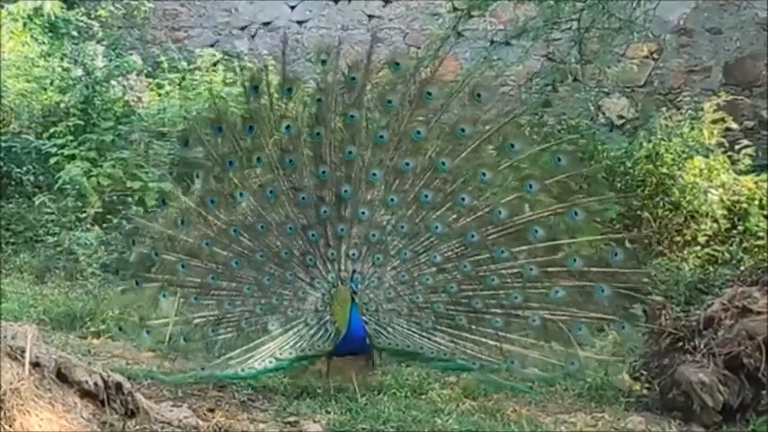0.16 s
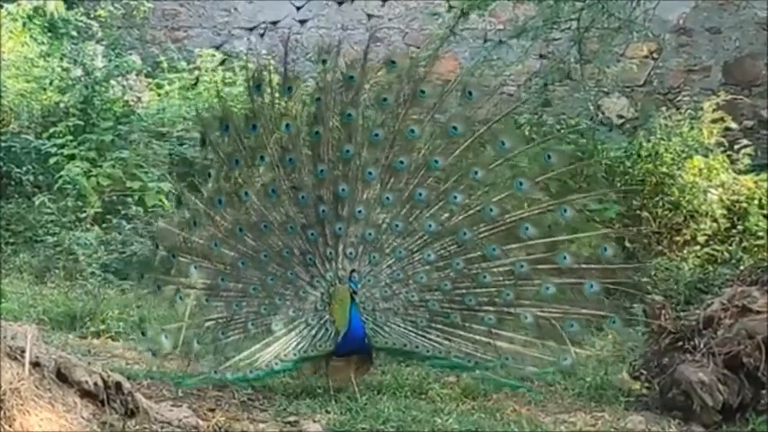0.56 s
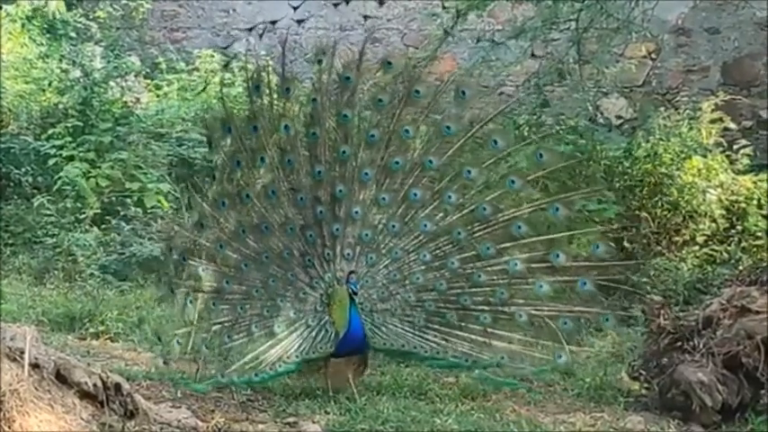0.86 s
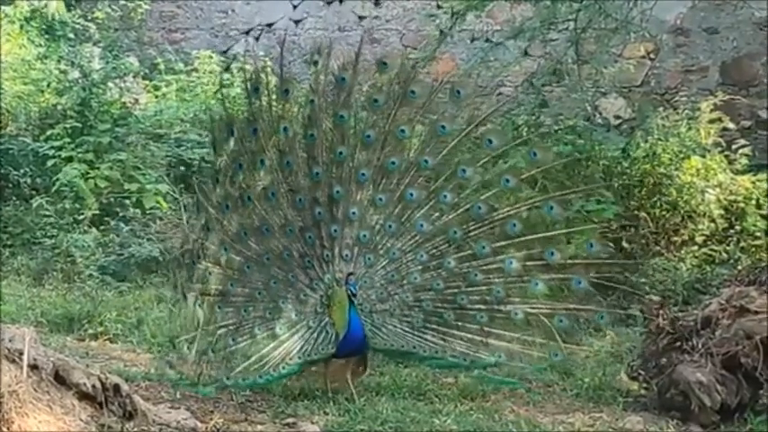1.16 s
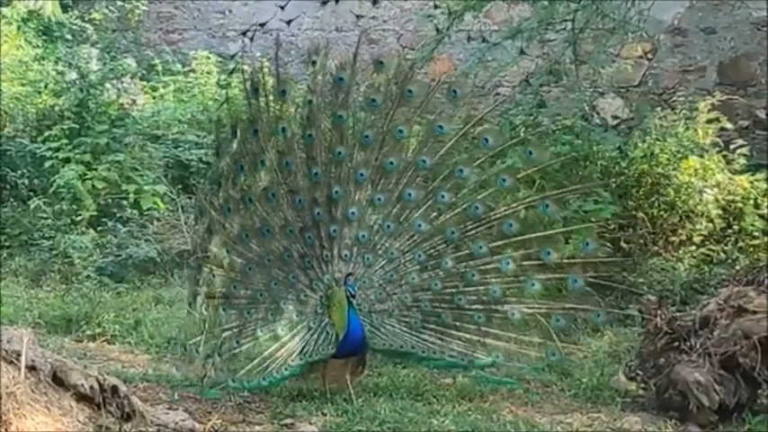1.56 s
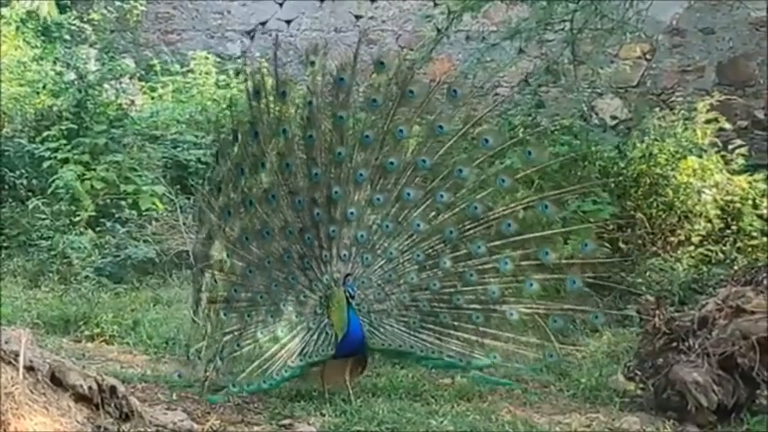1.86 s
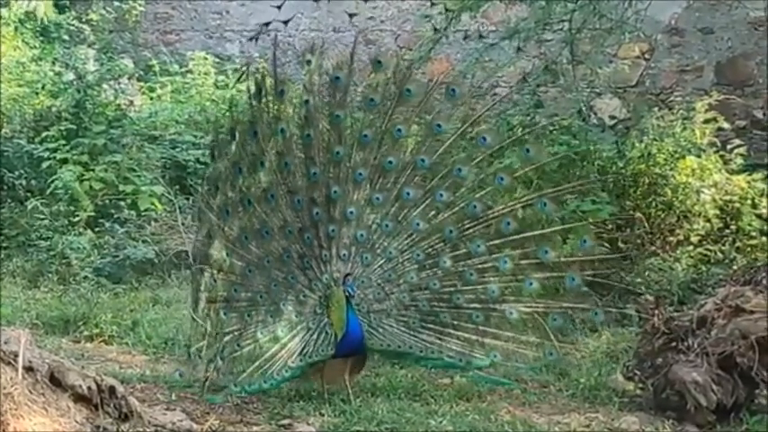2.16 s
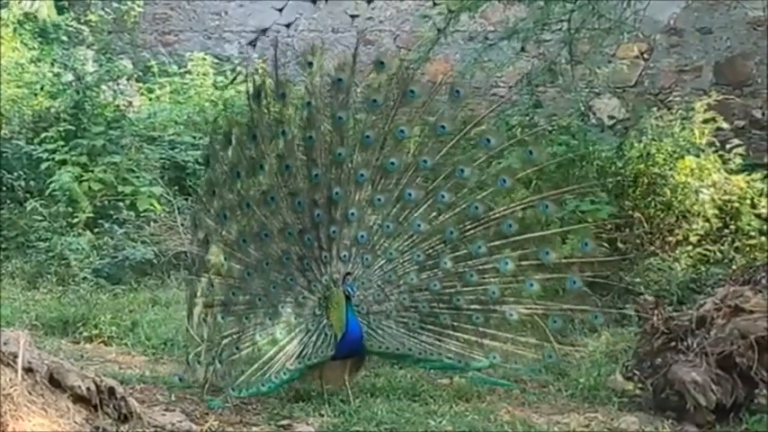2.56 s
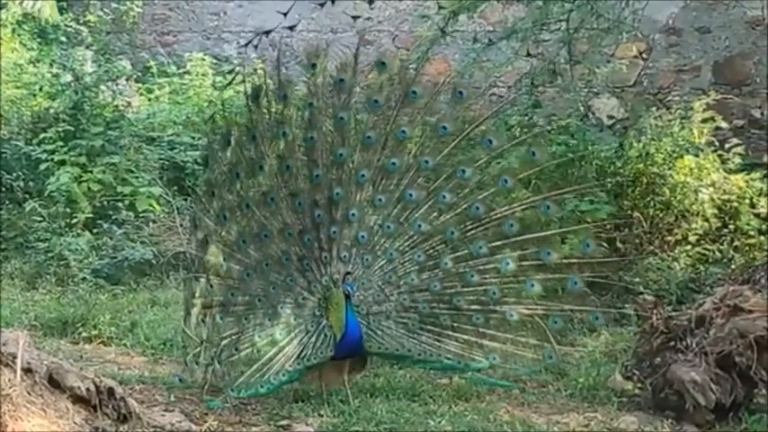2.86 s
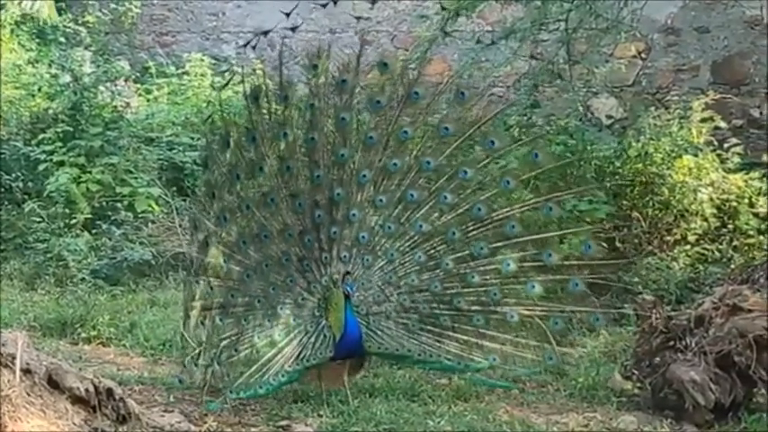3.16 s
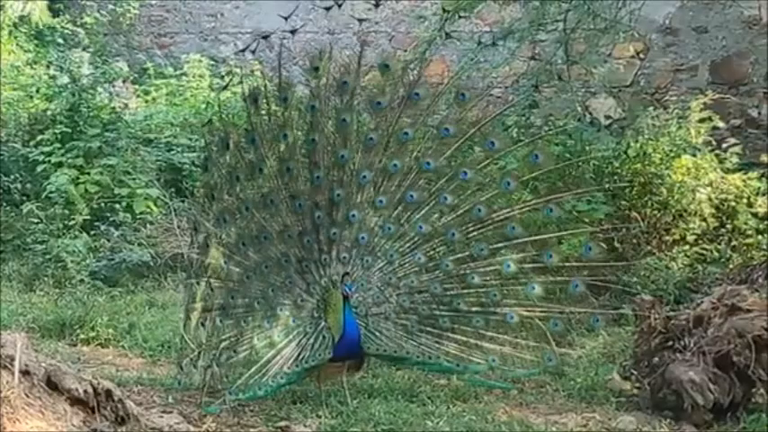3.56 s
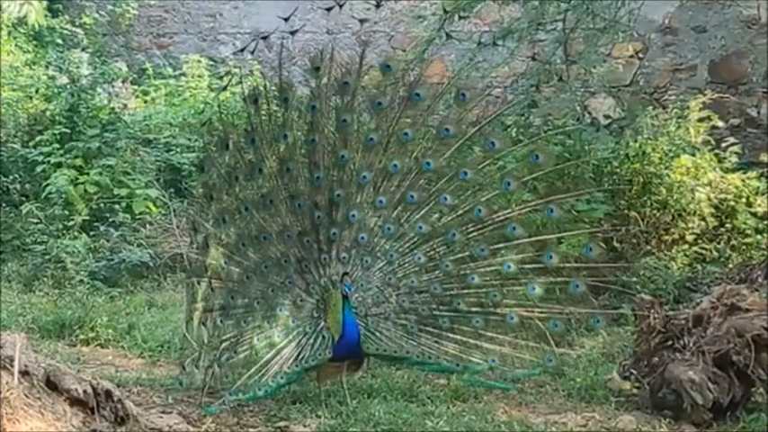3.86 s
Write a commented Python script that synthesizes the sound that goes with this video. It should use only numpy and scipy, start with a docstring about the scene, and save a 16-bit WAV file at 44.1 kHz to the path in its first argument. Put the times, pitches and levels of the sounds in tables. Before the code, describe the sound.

A peacock cries loudly from the start, the tail of one call followed by six nasal, brassy cries that rise and fall, each longer and more widely spaced, ending near 2.3 s with a brief garden echo. From about 2.5 s a faint high trill ticks steadily on the left, with occasional chirps, distant soft coos, low hum, rustling leaves and small dry scrapes near 3.1 and 3.7 s.

```python
"""In a walled garden that echoes briefly, a peacock a few metres from the stereo microphones gives seven
arched, brassy cries: gliding harmonics under a fixed throat colour, raspier when the pitch is low.
Behind it a small bird trills and another chirps in near-sine sweeps, and a dove coos softly far off.
Shaped noise makes the leaves, which rustle and scrape over a low hum."""
import sys
import numpy as np
from scipy import signal
from scipy.fft import rfft, irfft, next_fast_len
from scipy.io import wavfile
from scipy.ndimage import uniform_filter1d

SR = 44100
rng = np.random.default_rng(int(sys.argv[2]) if len(sys.argv) > 2 else 0)


def store_wav(level_fs):
    """Save 16-bit WAV to argv[1]."""
    pcm = np.round(np.clip(np.atleast_2d(level_fs), -1, 1) * 32767)
    wavfile.write(sys.argv[1], SR, pcm.T.astype(np.int16))


N = 176400
T = np.arange(N) / SR


def undb(db):
    """Decibels to amplitude."""
    return 10 ** (np.asarray(db) / 20)


def read(table, hz, axis=1):
    """A column of a table at these frequencies, straight on a log axis."""
    table = np.array(sorted(table), float)
    return np.interp(np.log(hz), np.log(table[:, 0]), table[:, axis])


def walk(rate_hz, size=N):
    """Smooth chance with spread 1: noise averaged twice over one period of the rate."""
    width = max(int(SR / rate_hz), 1)
    w = uniform_filter1d(uniform_filter1d(rng.standard_normal(size), width), width)
    return w / w.std()


def pan(x, db):
    """Left and right copies, the left louder by db."""
    return x * undb(np.array([[db], [-db]]) / 2)


def gate(t, length, attack, release):
    """Rounded rise and fall."""
    nearest_edge = np.minimum(t / attack, (length - t) / release)
    return np.sin(np.pi / 2 * np.clip(nearest_edge, 0, 1)) ** 2


# The peacock's cries, one list each, before throat colour: start_s [s], pitch_hz [Hz], level_db [relative dB]
CRIES = [
    [(0.0, 658, -12), (0.023, 633, -18.5), (0.044, 585, -26.5), (0.058, 495, -25)],
    [(0.166, 601.4, -25.5), (0.214, 649, -16.5), (0.244, 687, -20.5), (0.273, 699, -18),
     (0.3, 700.6, -20.5), (0.328, 664.6, -17), (0.353, 622, -20), (0.367, 575, -26), (0.378, 525, -30.5)],
    [(0.473, 595, -27.5), (0.518, 651, -16), (0.546, 689.7, -19.5), (0.575, 700, -18),
     (0.601, 703.5, -18.5), (0.627, 665, -17.5), (0.651, 644, -18), (0.665, 576, -25.5), (0.675, 504, -25)],
    [(0.772, 592, -32.5), (0.79, 618, -23.5), (0.816, 649, -16.5), (0.844, 673, -22.5), (0.872, 703, -16.5),
     (0.898, 708, -21), (0.924, 668, -17), (0.948, 641, -19.5), (0.962, 563, -23), (0.972, 540, -31)],
    [(1.084, 593, -32.5), (1.105, 631.5, -20.5), (1.136, 659, -19), (1.17, 691, -19.5), (1.203, 707.3, -17),
     (1.234, 711, -17.5), (1.265, 678, -20), (1.293, 644, -18.5), (1.31, 586, -26), (1.322, 528, -20)],
    [(1.446, 591, -30.5), (1.471, 636, -18.5), (1.507, 667, -21), (1.545, 708, -18), (1.584, 712.3, -17),
     (1.62, 713.6, -15), (1.656, 690.7, -20), (1.689, 648, -15.5), (1.708, 595.5, -26.5),
     (1.722, 547, -23.5)],
    [(1.896, 586, -34), (1.932, 635, -21.5), (1.983, 686, -19), (2.039, 714, -17.5), (2.094, 714.4, -15),
     (2.145, 718.8, -15.5), (2.197, 690, -20), (2.244, 647, -17), (2.272, 609, -24), (2.292, 552, -21.5)],
]
# Colour of throat and path at the two microphones: frequency_hz [Hz], left_db [dB], right_db [dB]
THROAT_COLOUR = [(600, -32, -34), (710, -9, -10), (1200, 2, -2), (1330, 4, 2), (1430, -1, -3),
                 (1850, -2, -2), (2050, -4, -9), (2140, -2, 1), (2350, 2, 7), (2500, -11, -5),
                 (2650, -4, 0), (2850, -7, -1), (3050, -8, -10), (3250, 1, -6), (3450, -9, -7),
                 (3800, -12, -9), (4250, -6, 3), (4600, -8, -1), (5000, -19, -4), (5700, -17, -1),
                 (6000, -20, -7), (6420, -25, -18), (6800, -27, -17), (7100, -12, -2), (7400, -20, 0),
                 (7830, -14, 6), (8200, -21, -8), (8600, -6, 2), (9200, -3, -5), (9600, -19, -24),
                 (10700, -14, -28), (11400, -39, -38), (13300, -26, -26)]
# Phase between the microphones: frequency_hz [Hz], left_lead_rad [radians by which left leads]
LEFT_LEAD = [(600, -.2), (2100, -.4), (2900, -1), (3250, 1.6), (3500, -1.2), (5300, -1.4), (6300, 2),
             (7100, -.9), (7900, -.9), (8250, -3.4), (9300, -3.6), (14000, -9)]
ATTACK_S, RELEASE_S = 0.0099, 0.02
JITTER, JITTER_HZ = 0.00068, 60  # spread of pitch as a fraction, and its rate
SHIMMER_DB, SHIMMER_HZ = 1.9, 50  # spread of each harmonic's level, and its rate
# Noisy skirt of each harmonic, stronger as the pitch sinks below CLEAN_HZ
RASP_DB, RASP_HZ, CLEAN_HZ, RASP_DB_PER_HZ = -28, 300, 670.6, 0.75
DULL_DB_PER_OCTAVE_PER_HZ = 0.0898  # treble tilt for each Hz the pitch lies below CLEAN_HZ
# The voice cracks and dulls as it passes this pitch
BREAK_HZ, BREAK_WIDTH_HZ, BREAK_DB_PER_OCTAVE = 682.4, 9, 5.5


def peacock():
    """Harmonics of the arching pitch slide under a fixed colour; low pitch is raspier."""
    out = np.zeros((2, N))
    jitter = 1 + JITTER * walk(JITTER_HZ)
    wobble = [(walk(SHIMMER_HZ), walk(RASP_HZ), walk(RASP_HZ)) for _ in range(3)]
    for cry in CRIES:
        s, hz, db = np.array(cry).T
        on = (T >= s[0]) & (T < s[-1])
        t = T[on]
        smooth = lambda col: uniform_filter1d(np.interp(t, s, col), SR // 55, mode="nearest")
        pitch = smooth(hz) * jitter[on]
        phase = 2 * np.pi * np.cumsum(pitch) / SR
        slack = np.clip(CLEAN_HZ - pitch, -20, 200)
        crack = np.exp(-((pitch - BREAK_HZ) / BREAK_WIDTH_HZ) ** 2)
        rasp = np.minimum(undb(RASP_DB + RASP_DB_PER_HZ * slack) + crack, 1)
        dull = DULL_DB_PER_OCTAVE_PER_HZ * slack + BREAK_DB_PER_OCTAVE * crack
        attack = ATTACK_S if s[0] else .003  # the cry at time zero opens faster
        loud = undb(smooth(db)) * gate(t - s[0], s[-1] - s[0], attack, RELEASE_S)
        for k in range(1, 25):
            f = k * pitch
            # shifted copies of the three wobble sets keep the harmonics unlike
            shimmer, rasp_re, rasp_im = (np.roll(w, 997 * k)[on] for w in wobble[k % 3])
            steadiness = .3 if k == 2 else 1  # the second harmonic shimmers least
            level_db = SHIMMER_DB * shimmer * steadiness - dull * np.log2(f / 2500) - 8
            rasp_share = np.clip((k - 1.7) / 2.7, .1, 1)  # low harmonics stay cleaner
            skirt = 1 + rasp * rasp_share * (rasp_re + 1j * rasp_im)
            wave = loud * undb(level_db) * skirt
            wave = wave * np.exp(1j * (k * phase + np.pi * k * k / 12))
            left = wave * undb(read(THROAT_COLOUR, f)) * np.exp(1j * read(LEFT_LEAD, f))
            out[0, on] += left.real
            out[1, on] += wave.real * undb(read(THROAT_COLOUR, f, axis=2))
    return out


def whistle(start, length, hz, db, edge):
    """One near-sine note; hz is a function of time from its start."""
    t = np.clip(T - start, 0, length)
    return undb(db) * gate(t, length, edge, edge) * np.sin(2 * np.pi * np.cumsum(hz(t)) / SR)


# Notes of the small bird's trill: start_s [s], level_db [relative dB]
TRILL_NOTES = [(2.454, -57.5), (2.5324, -55.5), (2.617, -58), (2.7, -56), (2.7844, -55), (2.868, -55),
               (2.9535, -53.5), (3.0485, -54), (3.1318, -52), (3.2237, -56), (3.3041, -54), (3.3906, -54),
               (3.472, -54), (3.5603, -52.5), (3.647, -55), (3.728, -55.5), (3.815, -52.5), (3.899, -55)]
TRILL_HZ, TRILL_SAG_HZ_PER_S, TRILL_S, TRILL_PAN_DB = 4212, 140, 0.056, -13.5
# Depth of the opening scoop and closing fall as fractions of the pitch; time constant of the scoop
TRILL_SCOOP, TRILL_ARCH, TRILL_SCOOP_S = 0.25, 0.056, 0.00716


def trill():
    """Each note scoops up from below and arches over; the run sags a little."""
    out = 0
    for start, db in TRILL_NOTES:
        top_hz = TRILL_HZ - TRILL_SAG_HZ_PER_S * (start - TRILL_NOTES[0][0])
        scoop = lambda t: TRILL_SCOOP * np.exp(-t / TRILL_SCOOP_S)
        hz = lambda t: top_hz * (1 - scoop(t) - TRILL_ARCH * (t / TRILL_S) ** 3)
        out = out + whistle(start, TRILL_S, hz, db - 2.5, 0.012)
    return pan(out * undb(1.9 * walk(190)), TRILL_PAN_DB)


# The other bird's chirps: start_s [s], length_s [s], from_hz [Hz], to_hz [Hz], level_db [relative dB],
# warble_hz [Hz, spread of the pitch], second_voice [ratio to the first voice's pitch]
CHIRP_NOTES = [(0.658, 0.093, 4730, 5910, -49.5, 80.5, .9), (1.781, 0.05, 6050, 4600, -44, 323, 0.92),
               (2.855, 0.12, 4700, 5900, -55, 120, .89), (3.701, 0.088, 6300, 4640, -55, 250, 0.87),
               (3.955, 0.044, 4320, 6600, -57, 151, 0.85), (3.977, 0.029, 6000, 3760, -51.5, 151, 0.94)]
WARBLE_RATE_HZ, CHIRP_PAN_DB = 450, -5


def chirps():
    """Two-voiced sweeps whose pitches warble fast and separately, with a fluttering level."""
    out = 0
    flutter = undb(3 * walk(200))
    for start, length, a, b, db, warble_hz, ratio in CHIRP_NOTES:
        for r in (1, ratio):
            shake = warble_hz * walk(WARBLE_RATE_HZ)
            hz = lambda t: r * (a + (b - a) * t / length) + shake
            out = out + whistle(start, length, hz, db + 2, .015)
    return pan(out * flutter, CHIRP_PAN_DB)


# Dove coos far off, with one faint rising tone of a distant bird (780 to 940 Hz): start_s [s], length_s [s],
# from_hz [Hz], to_hz [Hz], level_db [relative dB]
FAR_CALLS = [(.01, .22, 580, 570, -60), (1.55, .22, 560, 550, -60), (2.52, .2, 285, 270, -71),
             (2.56, .29, 545, 540, -70), (2.63, .5, 780, 940, -77), (3.45, .18, 490, 550, -68),
             (3.65, .2, 660, 670, -72), (3.78, .3, 530, 540, -68)]


def coos():
    """Soft low tones that glide fastest at first and waver with distance."""
    out = 0
    for start, length, a, b, db in FAR_CALLS:
        hz = lambda t: a + (b - a) * np.sqrt(t / length)
        out = out + whistle(start, length, hz, db + 5, .05) * undb(3 * walk(15))
    return pan(out, 6)


# Colour of the walls' and bushes' reflections: frequency_hz [Hz], level_db [dB]
ECHO_COLOUR = [(450, -8), (700, 7), (1300, -5), (2200, 6), (4500, -0.5), (15000, -7.5)]
ECHO_GAP_S, ECHO_T60_S, ECHO_PATCHY_DB = 0.0013, 0.45, 3.5


def echo(x):
    """Scattered reflections from walls and bushes, unlike on left and right: decaying patchy noise."""
    t = np.arange(SR) / SR
    tail = np.array([rng.standard_normal(SR) * undb(ECHO_PATCHY_DB * walk(160, size=SR)) for _ in range(2)])
    tail *= undb(-60 * t / ECHO_T60_S) * np.clip(t / ECHO_GAP_S - 1, 0, 1)
    tail /= np.sqrt((tail ** 2).sum(axis=1, keepdims=True))
    n = next_fast_len(N + SR)
    colour = undb(read(ECHO_COLOUR, np.arange(1, n // 2 + 2) * SR / n))
    return irfft(rfft(x, n) * rfft(tail, n) * colour, n)[:, :N]


# Brushes through dry leaves: start_s [s], length_s [s], level_db [dB, relative to the grit]
LEAF_SCRAPES = [(3.09, .025, -56.5), (3.166, 0.062, -52.5), (3.742, 0.053, -58)]


def scrapes():
    """Short crackly brushes through dry leaves: band-limited noise of jumpy level."""
    grit = rng.standard_normal((2, N)) * undb(3.8 * walk(450))
    grit = signal.sosfilt(signal.butter(2, [1500, 6500], "bandpass", fs=SR, output="sos"), grit)
    strokes = sum(undb(db) * gate(T - s, length, 0.0049, length / 2) for s, length, db in LEAF_SCRAPES)
    return grit / grit.std() * strokes


# Colour of the garden's steady noise: frequency_hz [Hz], density_db [relative dB per Hz]
GARDEN_COLOUR = [(25, -3), (100, -18), (250, -7.5), (520, -11.5), (950, -17.5), (2900, -19.5), (4000, -15),
                 (5500, -15), (7700, -7.5), (9000, -17), (9700, -34), (15000, -48)]
# Its lean between the microphones: frequency_hz [Hz], left_minus_right_db [dB]
GARDEN_PAN = [(100, 1.5), (700, 4.5), (4300, -3), (8000, -4.5), (14000, 0)]
# Likeness of left and right: frequency_hz [Hz], likeness [0-1]
GARDEN_ALIKE = [(300, .6), (700, .2), (15000, 0)]
# Leaves, heard against RUSTLE_REF_DB: time_s [s], level_db [dB]
LEAF_LEVEL = [(2.45, -60), (2.68, -57.5), (3.2, -62.5), (3.46, -64.5), (3.95, -60)]
# Change of the low and middle background: time_s [s], level_db [dB]
HUM_LEVEL = [(2.5, 1.5), (3.2, -4), (3.6, -5.5)]
GARDEN_DB = -55.5  # before the swells and the two level curves
RUSTLE_FROM_HZ, RUSTLE_REF_DB = 4000, -61  # bands from here up follow the leaves alone


def garden():
    """Hum and leaves: third-octave bands of noise that swell together and flicker alone."""
    out = 0
    f = np.arange(1, N // 2 + 2) * SR / N
    swell = walk(0.83)
    alike = np.clip(read(GARDEN_ALIKE, f), -1, 1)
    noise = rfft(rng.standard_normal((2, N)))
    mid, side = noise * np.sqrt([1 + alike, 1 - alike]) * undb(read(GARDEN_COLOUR, f))
    both = np.array([mid + side, mid - side]) * undb(read(GARDEN_PAN, f) * np.array([[.5], [-.5]]))
    gain = undb(GARDEN_DB) / irfft(both, N).std()
    leaves = np.interp(T, *np.array(LEAF_LEVEL).T) - RUSTLE_REF_DB
    hum = np.interp(T, *np.array(HUM_LEVEL).T)
    for k in range(-18, 13):
        share = np.clip(1 - abs(3 * np.log2(f / 1000) - k), 0, 1)  # overlapping triangular bands
        rustle = np.clip(1000 * 2 ** (k / 3) / RUSTLE_FROM_HZ, 0, 1) ** 3
        level_db = swell + 1.6 * walk(7) + rustle * leaves + (1 - rustle) * hum
        out = out + irfft(both * share, N) * undb(level_db)
    return out * gain


ECHO_DB, BIRD_WET_DB = -10.5, -11  # sent to the echo from the peacock and from the other birds


def scene():
    """The peacock and birds, direct and echoed, over the garden."""
    cry = peacock()
    birds = trill() + chirps() + coos()
    echoes = echo(undb(ECHO_DB) * cry + undb(BIRD_WET_DB) * birds)
    return cry + birds + echoes + garden() + scrapes()


TOP_HZ = 14900


def record(dry):
    """The recorder cuts the top steeply; a 2 ms fade opens the sound."""
    fade = np.clip(T / .002, 0, 1)
    return signal.sosfilt(signal.ellip(10, .2, 80, TOP_HZ, fs=SR, output="sos"), dry * fade)


dry = scene()
out = record(dry)
store_wav(out)
```